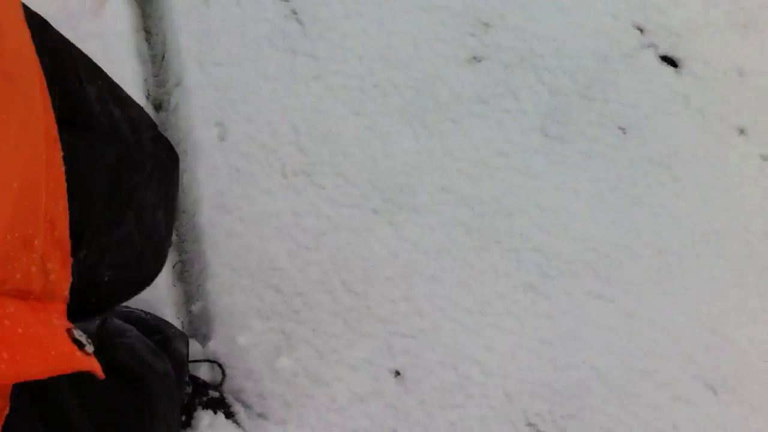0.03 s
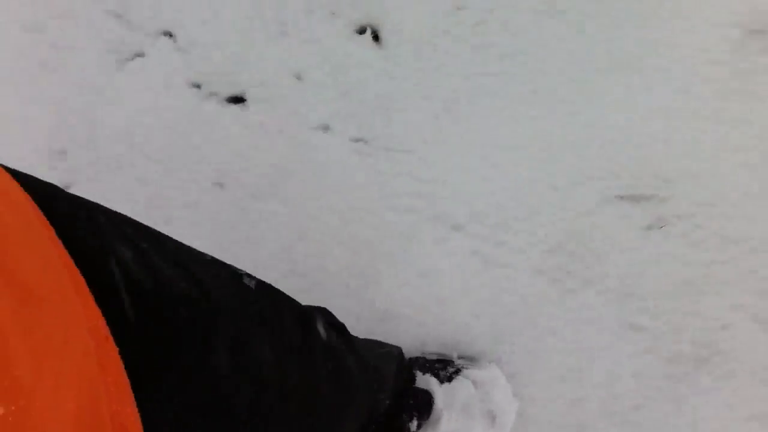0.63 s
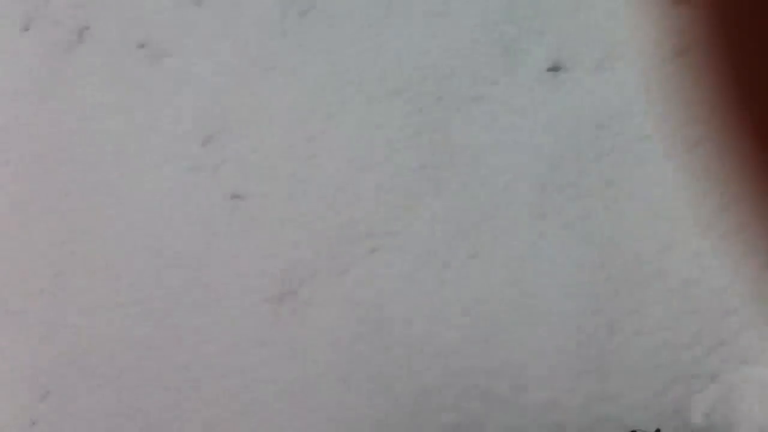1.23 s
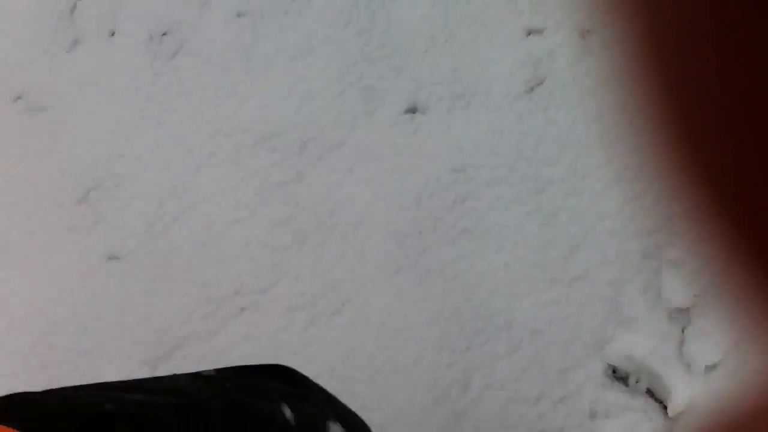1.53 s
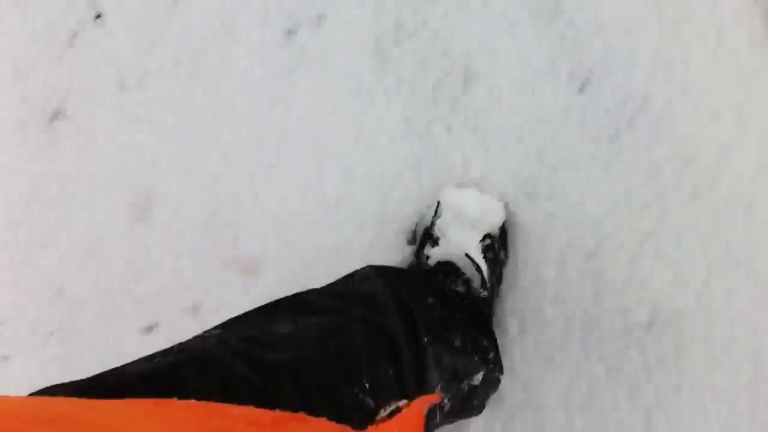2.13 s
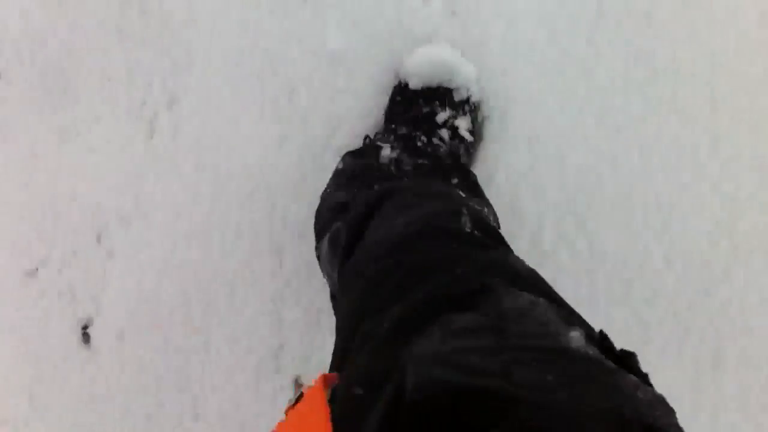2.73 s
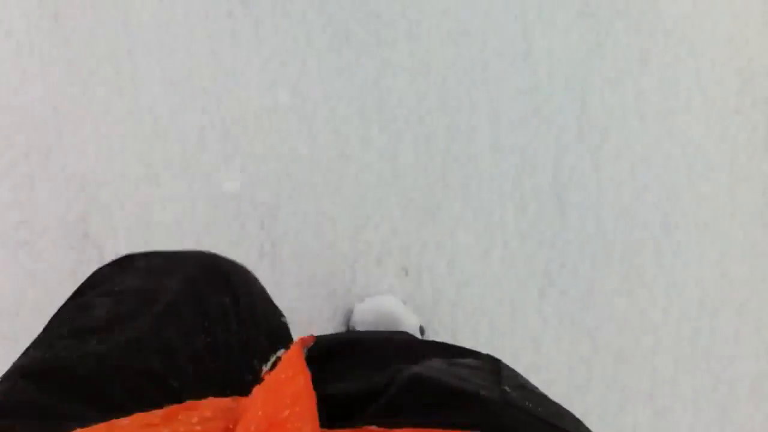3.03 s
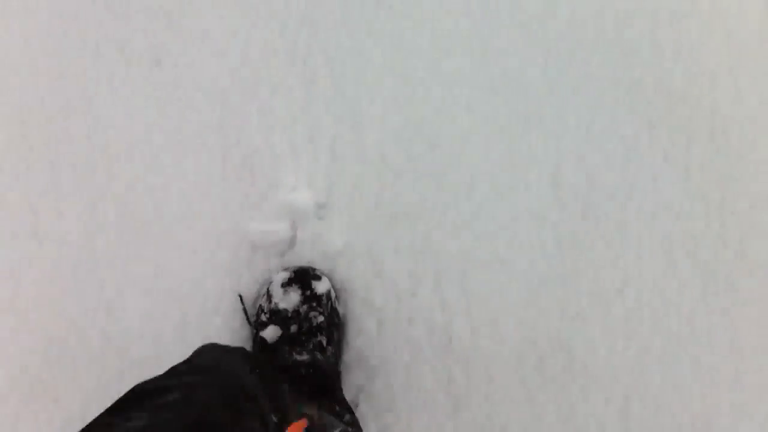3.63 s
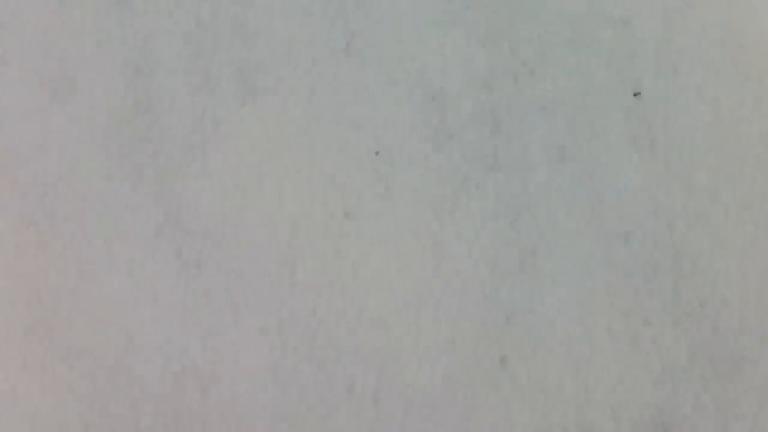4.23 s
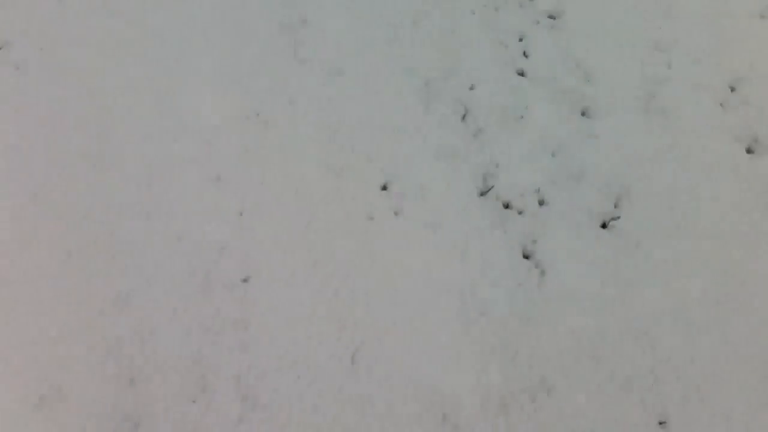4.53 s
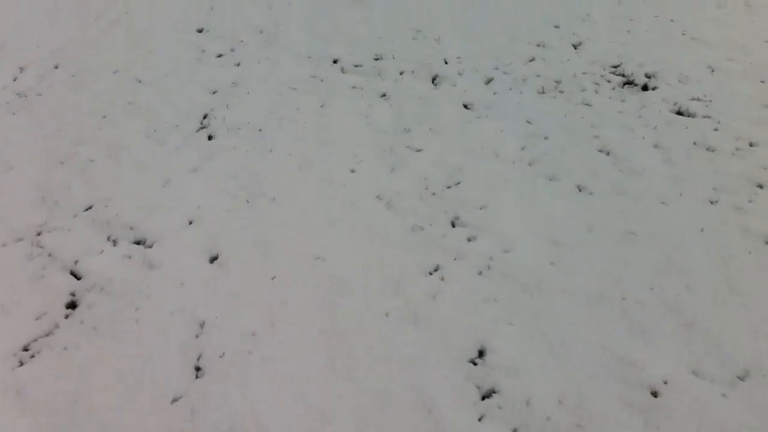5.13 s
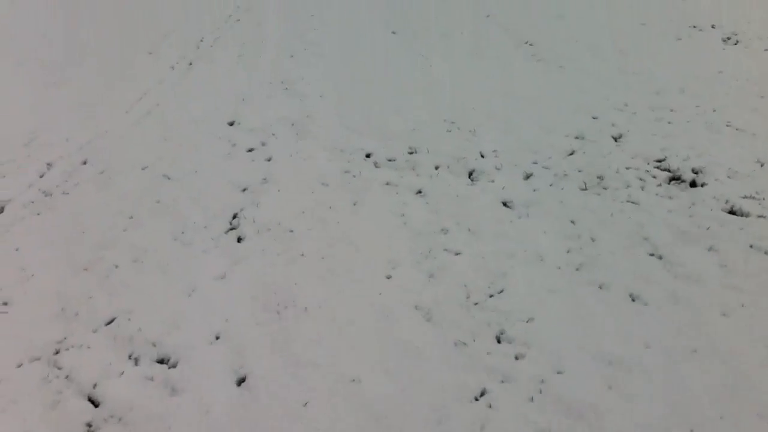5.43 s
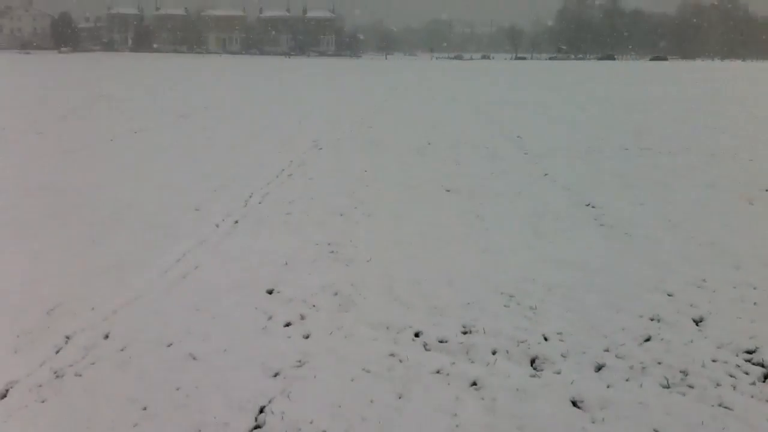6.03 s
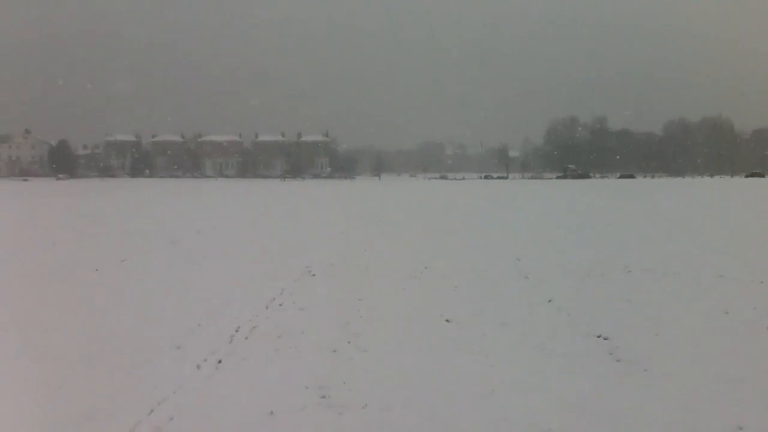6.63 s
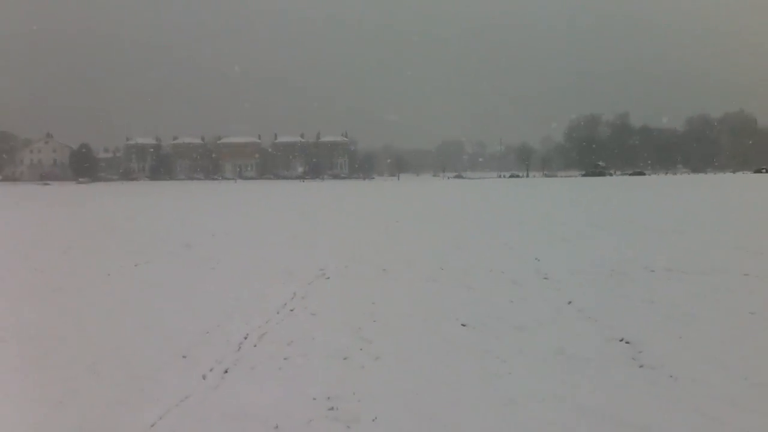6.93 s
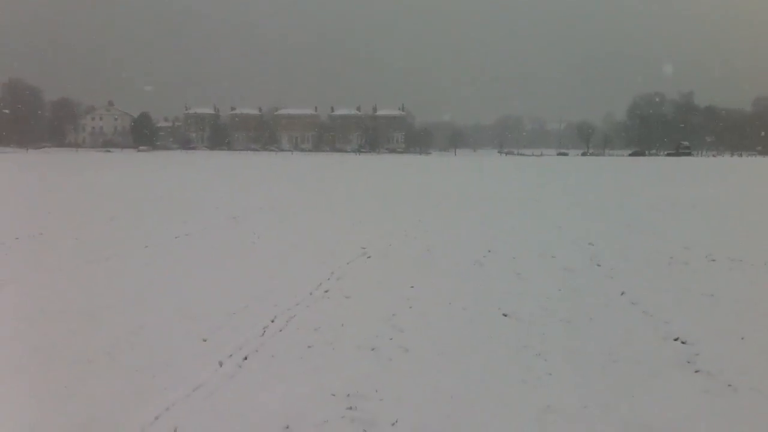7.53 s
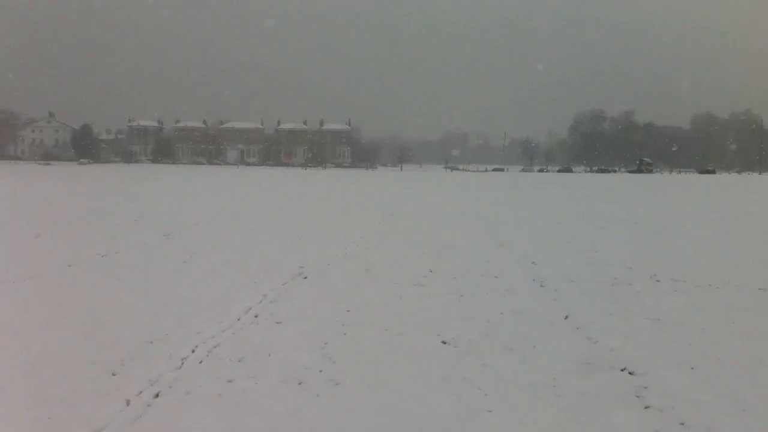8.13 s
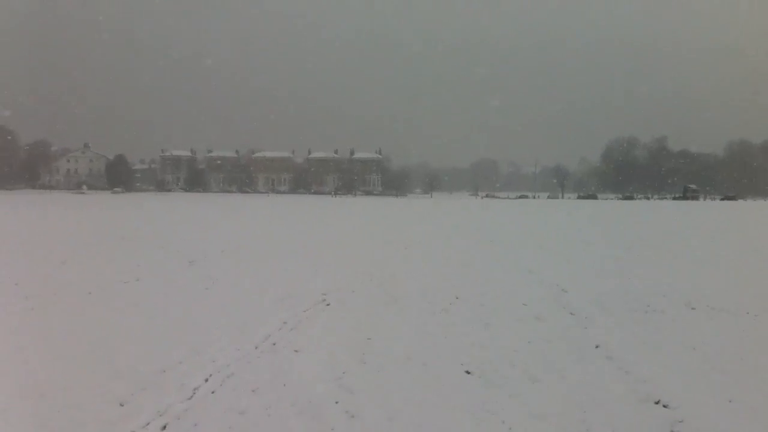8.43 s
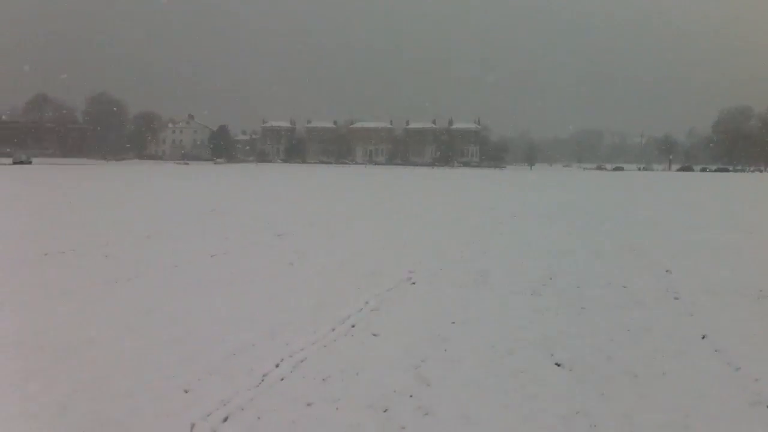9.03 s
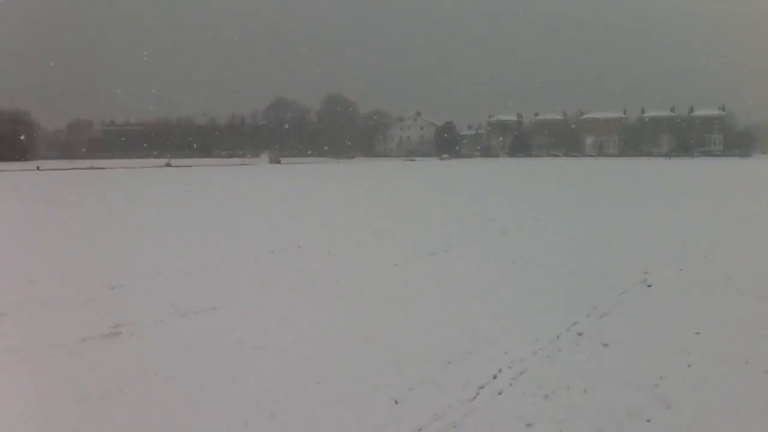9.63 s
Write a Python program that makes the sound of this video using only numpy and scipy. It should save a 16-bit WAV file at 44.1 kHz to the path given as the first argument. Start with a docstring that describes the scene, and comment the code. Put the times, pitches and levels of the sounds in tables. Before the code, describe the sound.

Someone walks over snow outdoors while uneven gusts hit the microphone directly, making low rumbles and short thumps. Two stronger blasts roar across it in the first half, then choppy buffeting continues until it fades shortly before the end. Faint trouser rustle, soft snow crunch and a few tiny ticks of flakes sit beneath the wind, over an even rush from far trees. There is no echo.

```python
"""Wind gusts buffet the microphone port of a small camera carried over a snowy field. Large eddies
rumble and smooth air drones hollowly; in the strong blows small vortices flutter, single ones slap
and a steady jet tears across the port. Underneath, trousers swish, boots crunch faintly in the snow,
a thin sizzle comes and goes and flakes tick on the casing, over the even rush of wind in far trees."""
import sys
import numpy as np
from scipy import signal
from scipy.fft import rfft, irfft, next_fast_len
from scipy.io import wavfile
from scipy.ndimage import uniform_filter1d, map_coordinates

SR = 44100
rng = np.random.default_rng(int(sys.argv[2]) if len(sys.argv) > 2 else 0)


def dump(signal):
    """Clip the signal to [-1, 1] and save it as 16-bit WAV at the path in sys.argv[1]."""
    limited = np.clip(np.atleast_2d(signal).T, -1, 1)
    pcm = np.round(limited * 32767).astype(np.int16)
    wavfile.write(sys.argv[1], SR, pcm)


N = 432180


def buffeting():
    """Wind hits the port: low rumble and tearing flutter ride the same quick bursts."""
    rumble_db, flutter_db = airflow()
    eddies = 1.32 * wobble(70) + 0.43 * wobble(37)
    body = amp(rumble_db - 0.18) * rumble(flutter_db, eddies)
    edge = amp(flutter_db - 3.0) * flutter(flutter_db, eddies)
    return body + edge


# bed of light air between the gusts: (time [s], rumble level [dB])
BREEZE = [(0, -41.5), (.3, -47), (.75, -41.5), (1.4, -24.5), (1.68, -43), (1.9, -31.5), (2.3, -36),
          (2.65, -46), (2.95, -44.5), (3.35, -30.5), (4.3, -38.5), (4.92, -50), (5.1, -43.5), (5.8, -36.5),
          (6.5, -36), (7.9, -31.5), (8.3, -51.5), (8.6, -35), (8.92, -59), (9.8, -78)]
# gusts at the port: (start [s], length [s], rumble level [dB], flutter level [dB])
GUSTS = [(0.12, 0.035, -31, -48), (0.388, 0.013, -29.5, -50), (0.496, 0.01, -32, -49),
         (0.675, 0.015, -34.5, -52), (.735, .02, -34, -58), (0.866, 0.058, -34.5, -47),
         (.922, 0.05054, -25, -27), (1.054, 0.0601, -26.5, -34), (1.174, 0.017, -21, -37),
         (1.21, .035, -25.5, -35.5), (1.259, .01, -22, -29), (1.284, 0.023, -18, -23),
         (1.316, 0.0545, -18.5, -23.5), (1.434, 0.0783, -20.5, -28), (1.538, 0.0337, -20.5, -28.5),
         (1.746, 0.028, -30, -42), (1.811, 0.039, -28, -39.5), (1.875, 0.039, -26.5, -40),
         (1.976, 0.042, -23, -38.5), (2.019, 0.0556, -24, -32), (2.118, 0.0557, -23, -39),
         (2.216, 0.0355, -22.5, -35), (2.28, 0.04, -27, -43), (2.766, 0.022, -38, -42),
         (2.909, 0.02, -34.5, -49), (3.072, 0.031, -26.5, -43), (3.214, 0.025, -21, -28.5),
         (3.254, 0.1306, -25, -33), (3.787, 0.1604, -29, -40), (4.043, 0.0097, -27, -48),
         (4.082, .02, -27.5, -33), (4.148, 0.036, -31, -44.5), (4.222, 0.031, -32, -42),
         (4.286, 0.023, -29, -36), (4.333, 0.025, -23, -31), (4.479, .014, -32, -49),
         (4.569, 0.068, -36.5, -50.5), (4.754, 0.047, -35, -46), (4.988, 0.054, -23, -34),
         (5.092, 0.0438, -22.5, -33.5), (5.176, 0.038, -23, -33), (5.243, 0.032, -27.5, -42),
         (5.5, 0.062, -23, -29.5), (5.571, 0.028, -16, -29.5), (5.618, 0.05, -23.5, -33.5),
         (5.686, 0.0546, -21, -33), (5.866, 0.032, -29, -39), (5.928, 0.028, -28.5, -42),
         (5.962, 0.033, -26, -34.5), (6.028, 0.04, -21, -33), (6.089, 0.027, -24, -44),
         (6.186, 0.033, -30, -43.5), (6.277, .008, -28, -45.5), (6.296, 0.024, -24.5, -39),
         (6.464, .02, -24, -35.5), (6.542, 0.037, -21.5, -34), (6.631, 0.018, -22.5, -29),
         (6.712, 0.029, -27, -39), (6.794, 0.011, -24, -36), (6.823, 0.027, -28.5, -40),
         (6.972, 0.024, -25.5, -42), (7.032, 0.023, -23, -37.5), (7.078, .026, -22.5, -35),
         (7.134, .015, -24, -40), (7.156, 0.0296, -22, -32.5), (7.236, 0.02465, -16.5, -25.5),
         (7.306, 0.0277, -17.5, -28.5), (7.428, 0.0402, -23.5, -35.5), (7.614, 0.0457, -26, -34),
         (7.717, 0.043, -29.5, -44.5), (7.8, 0.031, -28, -38), (7.845, 0.0447, -25, -39),
         (7.921, 0.011, -28, -43), (7.963, .014, -28.5, -41), (7.998, 0.0812, -28, -40),
         (8.103, 0.038, -31, -43), (8.236, 0.036, -32.5, -49), (8.408, 0.0623, -28.5, -39),
         (8.477, 0.052, -33.5, -59), (8.598, 0.012, -31, -46), (8.64, .02, -33, -50),
         (8.685, 0.023, -33, -50.5), (8.799, 0.011, -30, -60)]


def airflow():
    """Envelopes of rumble and flutter in dB: the breeze, overtaken by each gust in turn."""
    rumble_db, = curves(BREEZE)
    flutter_db = rumble_db - 19  # light air barely flutters
    for start, length, large_db, small_db in GUSTS:
        shape_db = gust_shape(start, length)
        rumble_db = np.maximum(rumble_db, large_db + shape_db)
        flutter_db = np.maximum(flutter_db, small_db + 1.304 * shape_db)  # small eddies move steeply
    return rumble_db, flutter_db


def gust_shape(start, length, attack_s=0.01177, release_s=0.0146, sag_db=1):
    """One gust's envelope in dB: a sagging hold, with 10 dB slopes per attack and release time."""
    t = np.arange(N) / SR - start
    outside = np.maximum(-t, 0) / attack_s + np.maximum(t - length, 0) / release_s
    return sag_db * (.5 - np.clip(t / length, 0, 1)) - 10 * outside


# EQ of the large eddies, before air speed bends it: (frequency [Hz], level [dB])
RUMBLE_EQ = [(20, -19), (45, -40), (70, -21.5), (100, -8), (140, 2), (195, 3), (255, -2), (330, -6.5),
             (440, -13), (700, -32.5), (1500, -100)]


def rumble(flutter_db, eddies):
    """Large eddies; faster air carries them past the port sooner, so the rumble rises in pitch."""
    speed = 2 ** (np.maximum(flutter_db, -50) / 75)
    travelled = np.cumsum(speed) / np.sum(speed) * (N - 1)
    large = map_coordinates(coloured(grainy(170, 2.34), RUMBLE_EQ), [travelled])
    return steadied(bass_cut(large * amp(3.27 * eddies), 71, order=3), 0.028)


def flutter(flutter_db, eddies, count=6000, half_width=140):
    """A stream of small vortices: the faster the air and stronger the vortex, the sharper its spike."""
    at = rng.integers(half_width, N - half_width, count)
    strength, spread, sign = rng.standard_normal((count, 3)).T
    lift_db = 4 * strength + 2 * eddies[at]
    sharp_hz = 1080 * 2 ** (flutter_db[at] / 25 + lift_db / 30 + 0.029 * spread)
    offset = np.arange(-half_width, half_width)
    shapes = vortex(offset / SR, np.clip(sharp_hz, 280, 900)[:, None])
    spikes = (np.sign(sign) * amp(lift_db))[:, None] * shapes
    stream = np.bincount((at[:, None] + offset).ravel(), spikes.ravel(), N)
    return steadied(bass_cut(stream, 330, order=2), .04)


def vortex(t, sharp_hz):
    """The rounded pressure spike of one passing vortex."""
    return 1 / (1 + (2.4 * sharp_hz * t) ** 2) ** 4


def bass_cut(x, hz, order):
    """The port lets slow pressure changes leak away, so every spike swings back."""
    return signal.sosfilt(signal.butter(order, hz, "highpass", fs=SR, output="sos"), x)


# single vortex hits: (time [s], level [dB], nominal sharpness [Hz])
SLAPS = [(0.42, -10, 365), (0.922, -17, 800), (0.938, -8, 880), (1.15, -17, 1130), (1.206, -12, 606),
         (1.264, -15, 680), (1.277, -8, 880), (1.285, -4.5, 520), (1.325, -5, 480), (1.338, -4, 840),
         (1.358, -4, 554), (1.37, -4, 1293), (1.396, -7, 1050), (1.45, -8.5, 910), (1.491, -7.5, 563),
         (1.501, -7, 600), (1.513, -4.5, 697), (1.541, -15, 750), (1.563, -12.5, 580), (1.812, -21, 509),
         (2.041, -17.5, 502), (2.189, -11, 413), (2.222, -17, 400), (2.324, -20, 310), (2.284, -8, 650),
         (2.977, -18, 360), (3.04, -22.5, 355), (3.094, -20, 328), (3.124, -19, 358.4), (3.218, -9, 723),
         (3.257, -16, 450), (3.347, -12, 592), (3.39, -13, 417), (3.448, -10.5, 680), (3.54, -10, 798.3),
         (4.094, -15.5, 619.3), (4.302, -4, 525), (4.336, -14, 396.3), (4.354, -6.5, 414),
         (4.485, -17, 470), (5.066, -9, 624), (5.099, -11.5, 970), (5.173, -12, 560), (5.193, -9, 626),
         (5.258, -15.5, 390), (5.502, -14, 448), (5.529, -10, 950), (5.564, -7.5, 825), (5.577, -5, 560),
         (5.588, -16, 750), (5.601, -14, 380), (5.626, -11.5, 620), (5.651, -11.5, 604), (5.663, -8, 460),
         (5.71, -13.5, 770), (5.764, -5, 386), (5.872, -15.5, 855), (5.975, -12.5, 390), (6.043, -13, 478),
         (6.054, -18, 560), (6.101, -15, 322), (6.153, -20.5, 417), (6.207, -15.5, 533), (6.244, -20, 338),
         (6.475, -14.5, 442), (6.51, -12, 465), (6.635, -11, 379), (6.643, -11.5, 710), (6.651, -23, 760),
         (6.718, -16, 467), (6.8, -16.5, 480), (6.972, -14.5, 379.5), (7.017, -5.5, 630), (7.041, -16, 477),
         (7.167, -15.5, 380), (7.178, -11.5, 447), (7.206, -16.5, 297), (7.246, -6, 460), (7.28, -10, 514),
         (7.303, -13, 333), (7.32, -11, 750), (7.331, -7, 724), (7.462, -16.5, 396), (7.638, -6, 404),
         (7.807, -14, 516), (8.81, -26, 304), (8.036, -12.5, 335), (9.142, -31.5, 1344),
         (9.187, -30.5, 482), (9.315, -34, 305)]


def slaps():
    """A strong vortex hits the port: a spike with a sharper core, then a brief dull wake."""
    track, t = np.zeros(N), np.arange(-SR // 100, SR // 25) / SR
    for (s, db, sharp_hz), sign in zip(SLAPS, rng.choice([-1, 1], len(SLAPS))):
        wake = unit(signal.fftconvolve(rng.standard_normal(len(t)), vortex(t, 0.75 * sharp_hz), "same"))
        wake *= np.exp(-((t - .002) / 0.0054) ** 2)
        core = vortex(t, np.minimum(1.33 * sharp_hz, 1600))
        slap = bass_cut(vortex(t, 0.73 * sharp_hz) + 0.09 * core + 0.1 * wake, 192, order=3)
        add(track, sign * amp(db - 1.2) * slap / np.abs(slap).max(), s + t[0])
    return track


# steady blasts straight across the port: (time [s], level [dB], pitch [Hz])
BLASTS = [(1.02, -69.5, 329.6), (1.07, -24, 401.6), (1.14, -43, 359.7), (1.265, -26, 430.3),
          (1.285, -16, 478.3), (1.31, -24, 417), (1.335, -18.5, 454), (1.385, -20, 417),
          (1.425, -23.5, 383.8), (1.49, -28.5, 441), (1.525, -36, 380), (1.56, -21.5, 424.3),
          (1.61, -72, 303.4), (3.38, -74, 297.4), (3.42, -29.5, 384), (3.455, -17, 433.4),
          (3.52, -17.5, 424), (3.6, -22, 329.6), (3.7, -22, 324.5), (3.85, -27, 313.3), (3.94, -32, 285.4),
          (4.0, -61, 245)]
# EQ of the roar at a pitch of 410 Hz: (frequency [Hz], level [dB])
ROAR_EQ = [(40, -60), (120, -51), (230, -4), (330, 1.5), (410, 2), (560, -4.5), (800, -11.5), (1200, -18),
           (1700, -29.5), (2500, -44), (5000, -78)]


def blast():
    """A steady jet sheds vortices at a rate that follows its speed: a tearing roar in quick pulses."""
    level_db, pitch_hz = curves(BLASTS)
    travelled = np.cumsum(pitch_hz / 410) % (N - 1)
    roar = map_coordinates(coloured(grainy(200, 5.5), ROAR_EQ), [travelled])
    pulsing = unit(amp(2.6 * wobble(60)))
    return amp(level_db - 2.14) * pulsing * steadied(roar, 0.0063)


# hollow drone of smooth air across the port: (time [s], level [dB], pitch [Hz])
DRONE = [(0, -47, 174.3), (.25, -46, 169.5), (.45, -37, 183.5), (.55, -42.5, 191.5), (.68, -35, 199.3),
         (.82, -38, 202.2), (.91, -34.5, 216.9), (1.05, -38.5, 238.5), (1.2, -72.5, 235.9),
         (2.28, -70, 188.9), (2.34, -48, 186.4), (2.48, -32, 188), (2.58, -47, 182), (2.71, -49.5, 190.6),
         (2.775, -29.5, 259.4), (2.84, -44, 243.1), (2.91, -36, 260.4), (3, -43, 217.5), (3.1, -36, 227.2),
         (3.28, -39, 191.1), (3.45, -70, 190), (3.9, -70, 229.5), (4, -48, 235.4), (4.18, -37, 259.8),
         (4.42, -36, 240.6), (4.56, -51, 220.2), (4.7, -74, 220)]


def drone(q=3.65):
    """Smooth air sheds eddies at a nearly even rate: a narrow band whose pitch follows the speed."""
    level_db, pitch_hz = curves(DRONE)
    centre_hz = pitch_hz.mean()
    noise = rng.standard_normal(N)
    band = filtered(noise, lambda hz: 1 / (1 + (q * np.log((hz + 1) / centre_hz)) ** 2) ** 1.5)
    gliding = map_coordinates(band, [np.cumsum(pitch_hz / centre_hz)])
    flicker_db = 2.6 * wobble(40)
    return amp(level_db + flicker_db) * steadied(gliding, 0.029)


# EQs of the trouser swish and the snow fizz: (frequency [Hz], level [dB])
CLOTH_EQ = [(500, -35), (1500, 7), (3500, 3), (5000, 0), (6700, -2.5), (8200, -11), (10000, -9.5),
            (16000, -19)]
SNOW_EQ = [(3000, -24), (8000, -11.5), (10000, -11), (11500, -8.5), (13200, -5.5), (16000, -9)]


def walk():
    """Trouser legs rub in fine catches; powder snow gives way under the boots in tiny fractures."""
    rub, crush = legwork()
    unevenness = amp(0.97 * wobble(34))
    crisp = amp(-11) * catches()
    cloth = rub * coloured(unit(patchy(grainy(500, 1.5), depth_db=3)) + crisp, CLOTH_EQ)
    snow = crush * coloured(unit(patchy(grainy(700, 1.9), depth_db=3.5)) + crisp, SNOW_EQ)
    return unevenness * (cloth + snow)


# bed of walking rustle under the strides: (time [s], cloth level [dB], snow level [dB])
RUSTLE = [(0, -58.5, -68.5), (.3, -54, -69), (.45, -62, -66), (.9, -55, -66), (2, -57, -63),
          (3.4, -59.5, -64), (4.1, -57.5, -61.5), (5.1, -61.5, -63), (6.5, -65, -61.5), (7.05, -85, -67),
          (7.8, -65, -63.5), (9.3, -64, -70)]
# leg swings through the snow: (middle [s], length [s], cloth level [dB], snow level [dB])
STRIDES = [(0.277, 0.16, -55.5, -55.5), (0.994, 0.22, -57.5, -61.5), (1.39, 0.063, -64, -66),
           (1.637, 0.042, -56, -58), (1.757, 0.12, -50.5, -52), (2.188, 0.042, -55, -54),
           (2.427, 0.14, -56.5, -54.5), (2.749, 0.29, -60.5, -56.5), (3.165, 0.1, -49.5, -52.5),
           (3.255, .05, -56, -50), (3.602, 0.35, -58.5, -54.5), (3.906, 0.15, -52, -55.5),
           (4.605, 0.25, -55, -62), (4.778, .07, -60.5, -60), (4.957, 0.24, -71, -60),
           (5.4, 0.11, -57, -61), (5.86, .07, -64, -62), (6.16, 0.13, -61, -60), (6.43, 0.23, -70, -59),
           (6.8, 0.11, -63, -57.5), (7.28, .1, -59.5, -62), (7.61, .13, -72, -62), (8.256, 0.085, -68, -65),
           (9.687, 0.12, -61, -64.5)]


def legwork(swell_share=0.86, stop_s=0.014):
    """Gains of cloth and snow: each stride swells over the slowly shifting rustle until the foot lands."""
    t = np.arange(N) / SR
    power = amp(curves(RUSTLE)) ** 2
    for s, length, cloth_db, snow_db in STRIDES:
        swell = np.maximum(s - t, 0) / (swell_share * length)
        stop = np.maximum(t - s - length / 2, 0) / stop_s
        power = power + amp([[cloth_db], [snow_db]]) ** 2 * np.exp(-2 * swell ** 2 - 2 * stop)
    return np.sqrt(power)


def catches(per_second=260):
    """Stiff fabric and snow crust catch in sparse, sharp little snaps of uneven size."""
    return unit((rng.random(N) < per_second / SR) * rng.standard_normal(N))


def patchy(x, depth_db):
    """Folds and clods shift, so narrow resonances come and go in the sound."""
    spectra = signal.stft(x, nperseg=512)[2]
    bands = uniform_filter1d(rng.standard_normal(spectra.shape), 5, axis=0)
    patches = uniform_filter1d(bands, 12, axis=1)
    return signal.istft(spectra * amp(depth_db * unit(patches)), nperseg=512)[1][:N]


# boot and leg scuffs: (middle [s], length [s], level [dB], resonance [Hz])
SCUFFS = [(0.283, 0.044, -57.5, 7500), (0.343, 0.036, -52.5, 3700), (1.632, 0.026, -54, 4530),
          (1.747, 0.06, -52, 9650), (1.765, 0.069, -49, 5240), (3.15, 0.13, -51, 3920),
          (3.159, 0.079, -51.5, 5440), (3.89, 0.028, -51, 13000), (3.915, 0.057, -52, 4500),
          (4.616, 0.1, -55.5, 3140), (5.407, 0.1, -54, 2790), (6.068, 0.057, -56, 3085),
          (6.195, 0.07, -59, 6500), (6.196, 0.074, -58, 2980), (6.783, 0.12, -56.5, 3290),
          (7.602, 0.17, -60, 2700), (8.247, 0.2, -55, 2550), (8.998, 0.14, -59, 3230),
          (9.682, 0.25, -63, 3284), (9.71, .035, -58, 12800)]


def scuffs():
    """A boot presses into snow or the legs brush: a swell of fine catches rings in one resonance."""
    track, t = np.zeros(N), np.arange(-SR // 4, SR // 4) / SR
    for s, length, db, hz in SCUFFS:
        grit = rng.standard_normal(len(t)) * amp(6.4 * rng.standard_normal(len(t)))
        ring = signal.lfilter(*signal.iirpeak(hz, Q=8, fs=SR), grit)
        add(track, amp(db) * unit(ring) * np.exp(-(2 * t / length) ** 2), s + t[0])
    return track


# flakes and crystals on the casing: (time [s], peak level [dB], pitch [Hz], 60 dB decay [s])
TICKS = [(0.718, -44, 8250, 0.014), (.733, -44, 12000, .014), (3.545, -39, 11500, .012),
         (3.3159, -37, 12100, 0.012), (3.3687, -39.5, 9000, .008), (3.494, -41, 13000, .014),
         (4.595, -37.5, 14500, .008), (4.769, -41, 6740, 0.0086), (4.7912, -30.5, 8440, .005),
         (5.0297, -33, 4567, 0.009), (5.8995, -38, 11000, .014), (5.9409, -41.5, 6260, .012),
         (6.98, -45.5, 7900, 0.0117), (7.426, -46, 7600, .01), (7.899, -44, 10200, .012),
         (7.985, -44, 8500, 0.017), (8.6004, -46, 6500, 0.0089), (9.5771, -43, 10500, 0.0087)]


def ticks(faint_count=40, ping_q=4.5, crack_share=0.6):
    """Icy flakes strike the casing with a bright crack and a short ping."""
    track, t = np.zeros(N), np.arange(SR // 25) / SR
    # fainter ticks come with the snow that the boots stir up
    snow_db = curves(RUSTLE)[1]
    stirred = rng.uniform([0, 9, 8500], [N / SR, 18, 14000], (faint_count, 3))
    faint = [(s, snow_db[int(s * (SR - 1))] + over_db, hz, .008) for s, over_db, hz in stirred]
    for s, db, hz, t60 in [*TICKS, *faint]:
        contact = rng.standard_normal(len(t)) * amp(-60 * t / t60)
        ping = signal.lfilter(*signal.iirpeak(hz, ping_q, fs=SR), contact)
        tick = bass_cut(unit(ping) + crack_share * unit(contact), 0.55 * hz, order=6)
        add(track, amp(db) * tick / np.abs(tick).max(), s)
    return track


# bouts of thin, high sizzle: (start [s], length [s], level [dB])
SIZZLES = [(2.502, 0.25, -69), (4.555, 0.47, -65.5), (6.08, 0.47, -70)]
# EQ of the sizzle: (frequency [Hz], level [dB])
SIZZLE_EQ = [(9000, -40), (10600, -9), (11300, 8), (11800, 0), (12500, -10), (15000, -29.5)]


def sizzle(fade_s=.03):
    """A faint, narrow band of fine grains that sets in and stops within a moment."""
    t = np.arange(N) / SR
    gain = sum(amp(db) * np.interp(t, [s - fade_s, s, s + length, s + length + fade_s], [0, 1, 1, 0])
               for s, length, db in SIZZLES)
    return gain * coloured(grainy(500, 2.3), SIZZLE_EQ)


# far wind as the camera turns: (time [s], level [dB], centre of its broad hump [Hz])
FAR_WIND = [(0, -53, 1010), (.8, -50.5, 945), (1.7, -48, 1060), (2.2, -49, 1050), (2.9, -48.5, 1550),
            (3.8, -47.5, 1390), (4.3, -48, 1250), (5.2, -47, 1400), (6.1, -48, 1430), (6.6, -47, 1920),
            (7.4, -47.5, 1950), (8.3, -47, 2040), (9.2, -49, 1990), (9.8, -48, 1910)]
# EQ of wind in the trees: (frequency [Hz], level [dB])
TREES_EQ = [(20, -31), (70, -2.5), (160, 6.5), (300, 0), (550, 3.5), (1000, 1), (2000, -2.5), (3000, -8),
            (4000, -12), (6000, -22.5), (8000, -34), (16000, -23.5)]


def far_wind():
    """Trees rush evenly; a reflection off the walker adds ripples and a hump that camera tilt moves."""
    level_db, hump_hz = curves(FAR_WIND)

    def reflection(hz, centre):
        """A broad hump with comb ripples around it."""
        octaves = np.log2((hz + 1) / centre)
        ripple_db = 1.9 * np.cos(2 * np.pi * 3 * hz / centre) * np.exp(-(octaves / 0.9) ** 2)
        return amp(5.65 * np.exp(-(octaves / 0.72) ** 2) + ripple_db)

    rush = swept(coloured(grainy(40, 0.84), TREES_EQ), hump_hz, reflection)
    waver_db = .55 * wobble(7)
    return amp(level_db + waver_db) * unit(rush)


def amp(db):
    """Decibels to gain."""
    return 10 ** (np.asarray(db) / 20)


def unit(x):
    """Scaled to rms 1."""
    return x / np.sqrt(np.mean(x ** 2) + 1e-20)


def curves(rows):
    """One value per sample for each column after the time."""
    s, *cols = np.transpose(rows)
    return [np.interp(np.arange(N) / SR, s, c) for c in cols]


def wobble(rate):
    """A smooth random curve, rate knots a second."""
    return map_coordinates(rng.standard_normal(int(N * rate / SR) + 4), [np.arange(N) * rate / SR])


def grainy(rate, depth_db):
    """White noise that comes in random clumps."""
    return rng.standard_normal(N) * amp(depth_db * wobble(rate))


def filtered(x, response):
    """x through a filter whose gain is response(Hz)."""
    size = next_fast_len(N + SR // 2)
    return irfft(rfft(x, size) * response(np.fft.rfftfreq(size, 1 / SR)), size)[:N]


def coloured(x, eq):
    """x shaped by EQ points, at rms 1."""
    f, db = np.transpose(eq)
    return unit(filtered(x, lambda hz: amp(np.interp(np.log(hz + 1), np.log(f), db))))


def swept(x, control, response, size=512):
    """x through a filter response(Hz, control) that moves with the control curve."""
    frames = dict(nperseg=size, noverlap=size - size // 4)
    hz, s, spectra = signal.stft(x, SR, **frames)
    now = np.interp(s, np.arange(N) / SR, control)
    return signal.istft(spectra * response(hz[:, None], now), SR, **frames)[1][:N]


def steadied(x, seconds):
    """x levelled to rms 1 over stretches of this length; faster bursts stay."""
    size = max(int(seconds * SR), 2)
    power = uniform_filter1d(uniform_filter1d(x ** 2, size), size)
    return x / np.sqrt(np.abs(power) + 1e-12)


def add(track, sound, s):
    """Mixes a sound in from time s."""
    start = max(round(s * SR), 0)
    track[start:start + len(sound)] += sound[:max(N - start, 0)]


def scene():
    """The mono mix: open field, no echo."""
    port_wind = buffeting() + drone() + blast() + slaps()
    return (port_wind + walk() + scuffs() + sizzle() + ticks() + far_wind())[None]


def record(dry, top_hz=15870):
    """The camera keeps nothing above its band limit."""
    return filtered(dry[0], lambda hz: hz < top_hz)[None]


dry = scene()
out = record(dry)
dump(out)
```